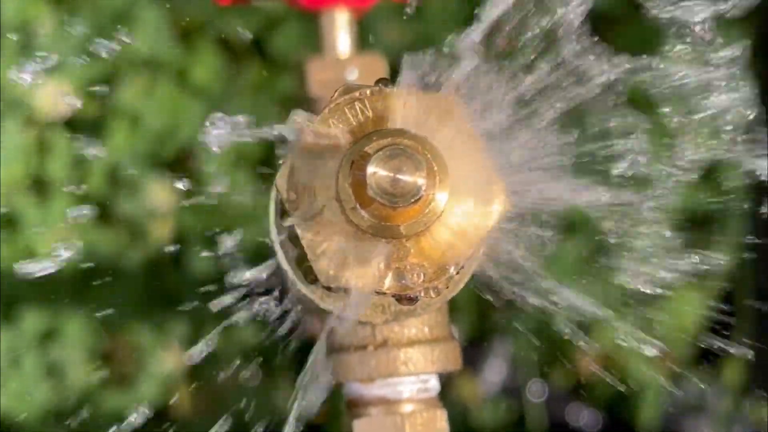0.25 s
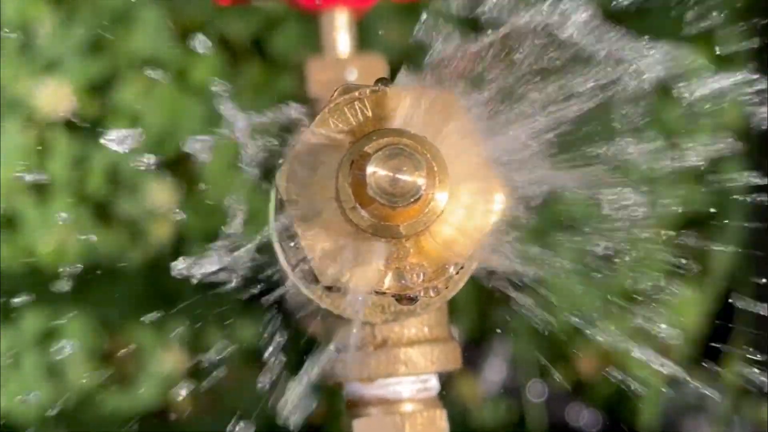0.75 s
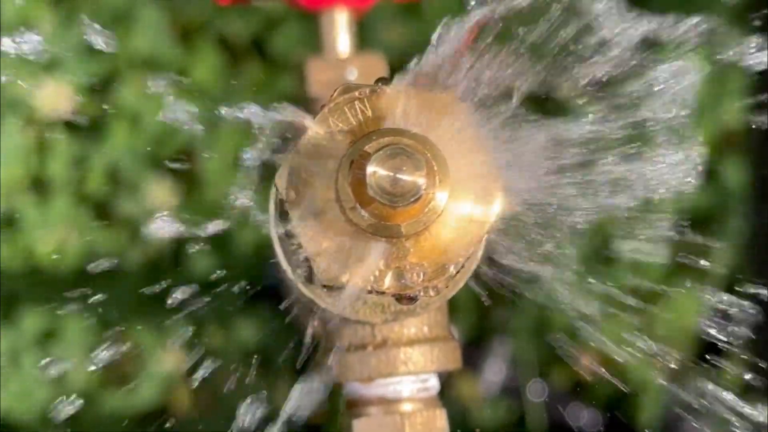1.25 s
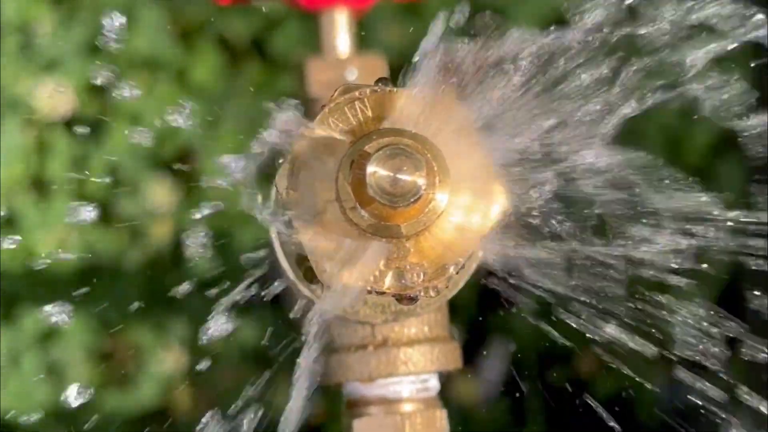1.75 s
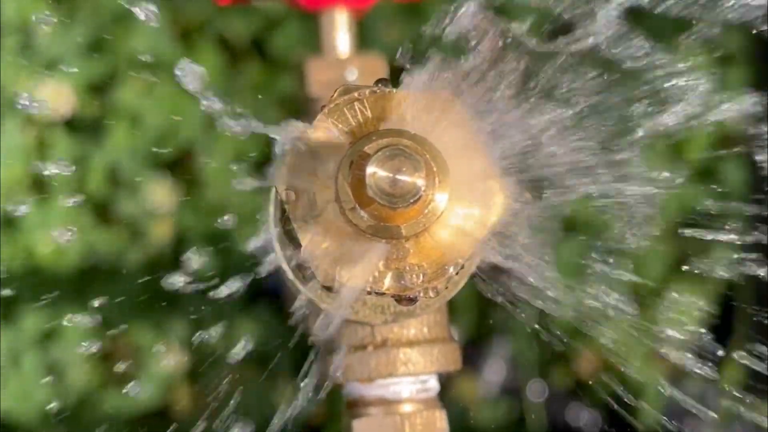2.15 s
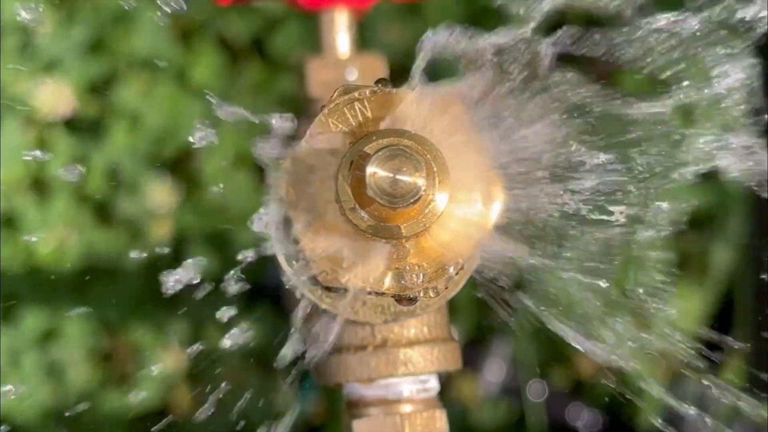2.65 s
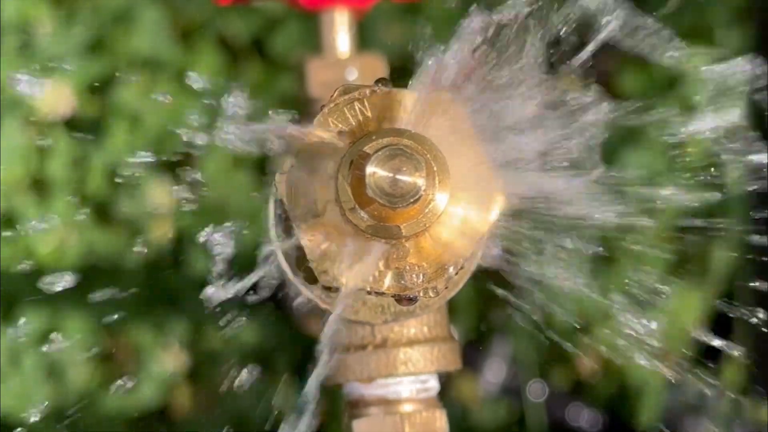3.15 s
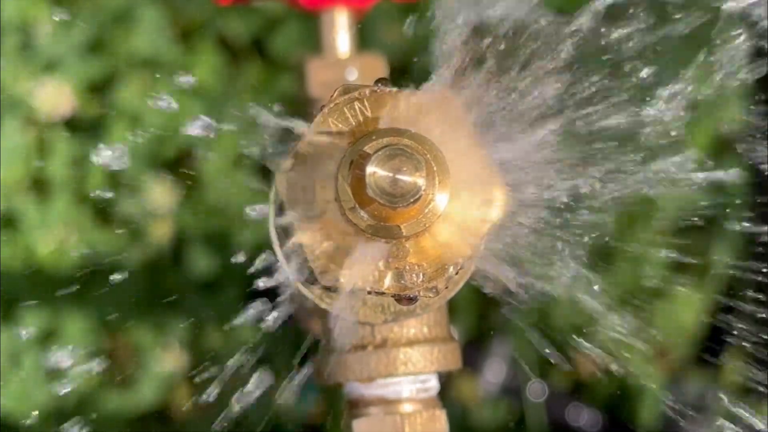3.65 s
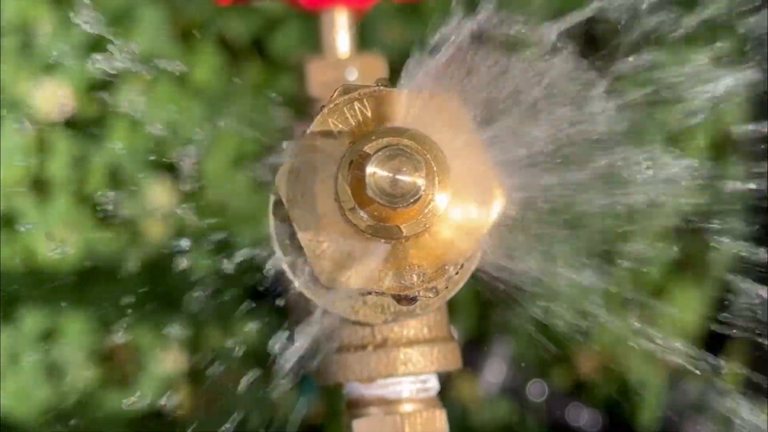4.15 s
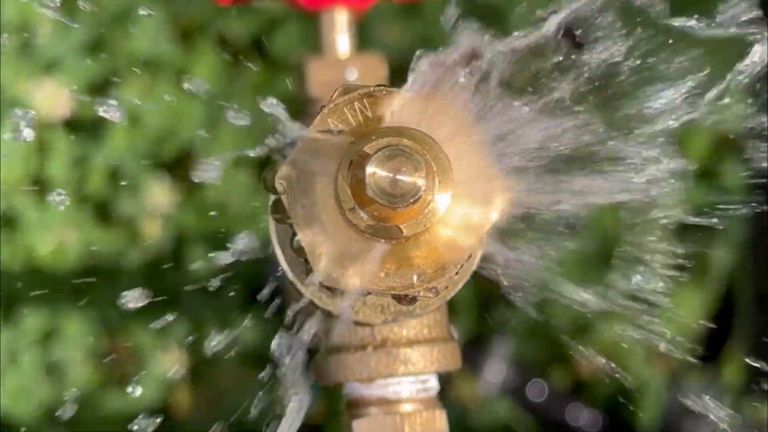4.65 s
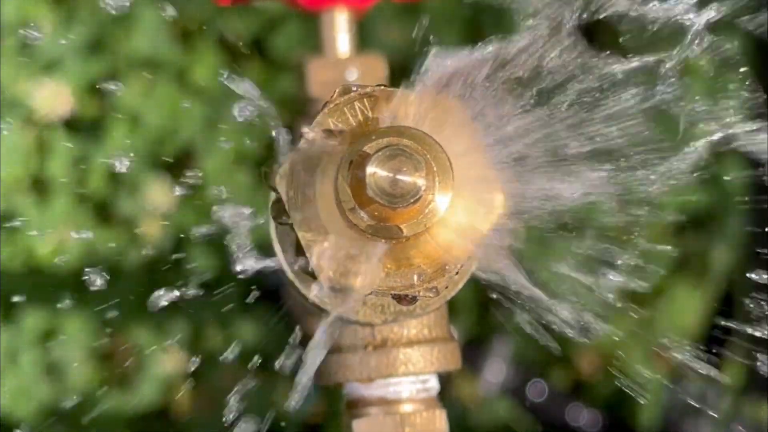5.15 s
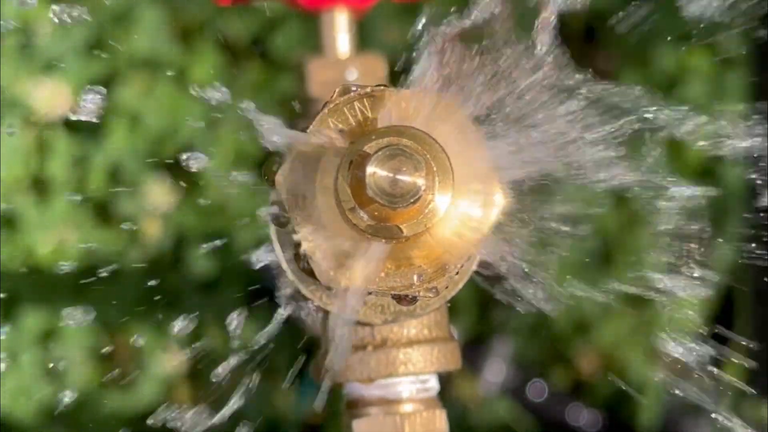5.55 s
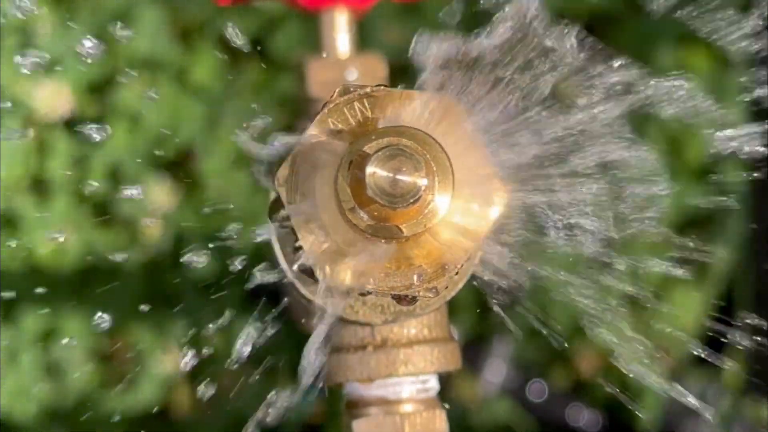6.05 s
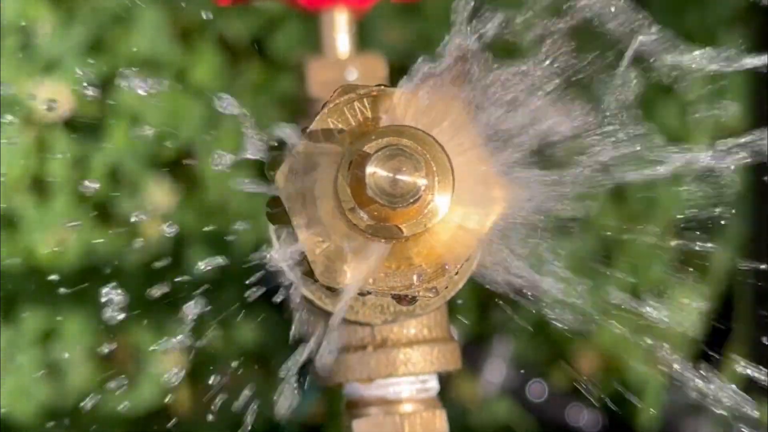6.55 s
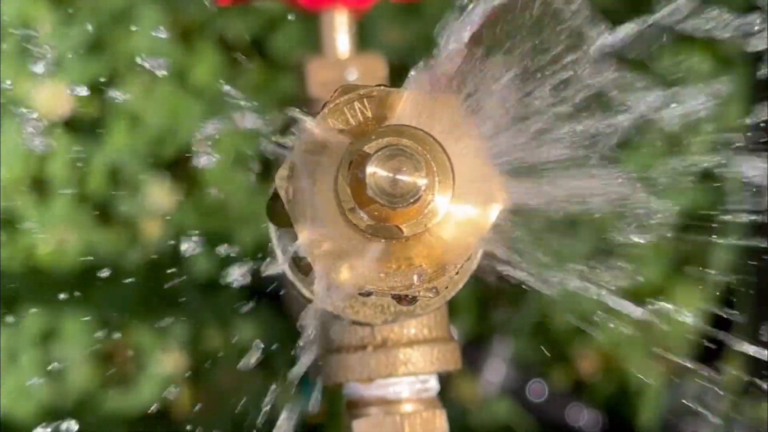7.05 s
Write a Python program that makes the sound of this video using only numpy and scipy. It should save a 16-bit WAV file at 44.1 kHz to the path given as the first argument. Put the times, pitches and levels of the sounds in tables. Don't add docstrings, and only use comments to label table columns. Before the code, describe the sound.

Close, steady, rapidly flapping water spray hisses and spatters from a metal sprinkler head, with small taps on its casing and faint machine hum behind.

```python
import sys
import numpy as np
from scipy import signal
from scipy.fft import rfft, irfft
from scipy.io import wavfile
from scipy.ndimage import uniform_filter1d

SR = 44100
rng = np.random.default_rng(int(sys.argv[2]) if len(sys.argv) > 2 else 0)


def decibels_to_gain(level_db):
    exponent = np.asarray(level_db, float) / 20
    return 10 ** exponent


def materialize(psi):
    bounded = np.clip(np.atleast_2d(psi).T, -1, 1)
    quanta = np.round(bounded * 32767).astype(np.int16)
    wavfile.write(sys.argv[1], SR, quanta)


N = 321048


def evened(x):
    return x / np.sqrt(np.mean(x ** 2) + 1e-20)


def read(points, hz):
    f, value = np.transpose(points)
    return np.interp(np.log(hz + 1), np.log(f + 1), value)


def follow(rows, column=1):
    return np.interp(np.arange(N) / SR, [r[0] for r in rows], [r[column] for r in rows])


def shaped(x, gain):
    return irfft(rfft(x) * gain(np.fft.rfftfreq(N, 1 / SR)), N)


def wobble(centre_hz, width_hz):
    def resonance(hz):
        return 1 / (1 + (2 * (hz - centre_hz) / width_hz) ** 2)
    return evened(shaped(rng.standard_normal(N), resonance))


# (time [s], level [dB])
FLOW = [(0, -30), (.5, -31.5), (1.2, -31), (1.6, -31.5), (2.1, -30.8), (2.7, -31.5), (3.2, -31.5),
        (3.55, -31), (3.85, -33), (4.25, -35), (4.5, -32.5), (5, -32.5), (5.3, -32), (5.8, -32),
        (6.3, -31.5), (6.8, -32.5), (7.28, -31.5)]


def flow_db():
    return follow(FLOW)


def flow_change_db():
    return flow_db() - np.mean(flow_db())


# (frequency [Hz], level under the sum [dB])
SIDE_LEVEL = [(60, -53), (200, -18), (380, -11.5), (720, -11.5), (1000, -35.5), (4500, -30), (5600, -18.5),
              (6800, -56), (8200, -13.5), (10000, -8), (15000, -5)]
# (frequency [Hz], share [0..1])
TIED_SHARE = [(100, .15), (300, 0.43), (1000, 0.26), (5000, .7), (15000, .85)]
# (frequency [Hz], phase [rad])
TIED_LEAD = [(100, -1.85), (1200, -1.85), (3000, 1.57), (15000, 1.57)]


def ports(pair):
    hz = np.fft.rfftfreq(N, 1 / SR)
    share = np.clip(read(TIED_SHARE, hz), 0, 1)
    tied = share * np.exp(1j * read(TIED_LEAD, hz)) * rfft(pair[0])
    loose = np.sqrt(1 - share ** 2) * rfft(pair[1])
    side = irfft(decibels_to_gain(read(SIDE_LEVEL, hz)) * (tied + loose), N)
    return np.array([pair[0], side])


# (frequency [Hz], density [dB per Hz])
RUMBLE_COLOUR = [(15, -45), (28, -20), (45, -5), (60, 2), (100, 0.5), (130, -3.5), (170, -10), (300, -15),
                 (450, -16.5), (650, -48.5)]


def rumble():
    start_db, sag_db_per_s, db_per_flow_db = -51., 0.09, 0.95
    gust_db, gust_hz = 1.1, 2.7
    pair = shaped(rng.standard_normal((2, N)), lambda hz: decibels_to_gain(read(RUMBLE_COLOUR, hz)))
    level_db = start_db - sag_db_per_s * np.arange(N) / SR + db_per_flow_db * flow_change_db()
    level_db = level_db + gust_db * wobble(0., gust_hz)
    return ports(pair / np.std(pair[0]) * decibels_to_gain(level_db))


# (frequency [Hz], sum level [dB], difference level [dB])
MOTOR_TONES = [(59.2, -64, -95), (236.9, -62, -77), (473.7, -75, -78), (521.2, -78, -80), (710.6, -73, -73)]


def motor():
    start_s, rise_s = 0.31, 0.31
    t, out = np.arange(N) / SR, np.zeros((2, N))
    dip_db = 0.45 * uniform_filter1d(flow_change_db(), size=SR // 2)
    for hz, sum_db, side_db in MOTOR_TONES:
        phase = 2 * np.pi * (hz * t + rng.random())
        level = np.sqrt(2) * decibels_to_gain(dip_db + 0.4 * wobble(0., 0.9))
        out += level * np.array([decibels_to_gain(sum_db) * np.cos(phase), decibels_to_gain(side_db) * np.sin(phase)])
    return out * np.clip((t - start_s) / rise_s, .2, 1)


# (time [s], frequency [Hz], level [dB])
ENGINE = [(0, 139, -61.5), (1.7, 140.9, -61), (2.9, 140.4, -58.5), (3.5, 138, -58), (4.2, 138.8, -68.5),
          (4.75, 139.1, -57.5), (5.2, 139, -86)]
# (time [s], frequency [Hz], level [dB])
WHINE = [(1.6, 168.4, -63), (2.6, 166.6, -67.5), (3.9, 166.2, -61)]


def engines():
    t, out = np.arange(N) / SR, np.zeros((2, N))
    for rows in ENGINE, WHINE:
        start_s, end_s = rows[0][0] - 0.066, rows[-1][0]
        fade = np.clip(np.minimum(t - start_s, end_s - t) / 0.25, 0, 1)
        level = decibels_to_gain(follow(rows, column=2) + 1.4 * wobble(0., 2.9))
        phase = 2 * np.pi * np.cumsum(follow(rows)) / SR
        out[0] += np.sqrt(2) * fade * level * np.cos(phase)
    return out


# (time [s], frequency [Hz], width [Hz], level [dB], t60 [s])
CLANK_RINGS = [
    (.255, 375, 21, -53, 0.45),
    (.275, 653, 24, -51, 1),
]


def clank():
    rise_s, side_db = .025, 1
    out = np.zeros((2, N))
    for s, centre_hz, width_hz, db, t60_s in CLANK_RINGS:
        t = np.maximum(np.arange(N) / SR - s, 0)
        ring = np.array([wobble(centre_hz, width_hz), decibels_to_gain(side_db) * wobble(centre_hz, width_hz)])
        out += ring * np.minimum(t / rise_s, 1) * decibels_to_gain(db - 60 * t / t60_s)
    return out


# (time [s], peak [dB], start pitch [Hz], end pitch [Hz], length [s])
KNOCKS = [
    (.4055, -37, 1500, 1350, .004),
    (0.407, -30, 760, 630, 0.011),
    (.408, -28.5, 517, 165, 0.0206),
    (1.347, -39, 600, 300, 0.0047),
    (2.0105, -36, 1420, 1380, .005),
    (2.029, -34, 1250, 1100, 0.003),
    (2.0529, -27, 1410, 1250, 0.0036),
    (2.0535, -35, 620, 260, 0.0044),
    (2.064, -35, 567, 250, 0.0043),
    (2.073, -38, 450, 250, 0.0043),
]


def knocks():
    lean = -0.68
    out = np.zeros((2, N))
    for s, db, start_hz, end_hz, length_s in KNOCKS:
        u = np.linspace(0, 1, round(length_s * SR))
        pitch_hz = start_hz * (end_hz / start_hz) ** u
        thud = decibels_to_gain(db) * np.sin(np.pi * u ** .7) * np.sin(2 * np.pi * np.cumsum(pitch_hz) / SR)
        side = lean * decibels_to_gain(read(SIDE_LEVEL, np.sqrt(start_hz * end_hz)))
        start = round(s * SR)
        out[:, start:start + len(u)] += np.outer([1, side], thud)
    return out


def droplets(per_s, spread_db, cycles, count):
    size = decibels_to_gain(spread_db * np.minimum(rng.exponential(1, N), 5)) * (rng.random(N) < per_s / SR)
    kind, out = rng.integers(0, count, N), np.zeros(N)
    for k, hz in enumerate(np.geomspace(500, 14500, count)):
        u = np.arange(400) / SR * hz / cycles
        grain = u * np.exp(-3 * u) * np.sin(2 * np.pi * cycles * u * (1 + 0.079 * u))
        grain = np.sqrt(hz) * grain / np.linalg.norm(grain)
        out += signal.oaconvolve(size * (kind == k), grain)[:N]
    return evened(out)


def sheet_flap():
    flap_hz, flap_width_hz = 111, 28
    swing = wobble(flap_hz, flap_width_hz) + 0.99 * wobble(0., 740.0) + 0.33 * wobble(5.7, 31.0)
    return 2.34 * np.tanh(swing / 2.73)


ZONE_EDGES = [1., 1800., 8300., 11800., 40000.]
# (share of the flap [ratio], own flicker [dB])
TEARING = [(0.58, 1), (0.89, 1.07), (1, .5), (0.75, 1.1)]


def torn_jet():
    drift_db, drift_hz = 0.56, 12
    depth_db = 2.5 + 0.23 * flow_change_db() + drift_db * wobble(0., drift_hz)
    flap = sheet_flap()
    hiss = 1.05 * rng.standard_normal(N)
    drops = 0.29 * droplets(per_s=7000., spread_db=2.6, cycles=3.2, count=24)
    jet = np.array([hiss + drops, rng.standard_normal(N)])
    out = np.zeros((2, N))
    for low, high, (shared, own_db) in zip(ZONE_EDGES, ZONE_EDGES[1:], TEARING):
        def zone(hz):
            return 1 / np.sqrt((1 + (low / (hz + 1)) ** 6) * (1 + (hz / high) ** 6))
        throb_db = shared * depth_db * flap + own_db * wobble(0., 180.0)
        out += shaped(jet, zone) * evened(decibels_to_gain(throb_db))
    return out


# (frequency [Hz], density [dB per Hz])
SPRAY_COLOUR = [(180, -38), (300, -28), (535, -12.5), (1140, -4), (1540, -3), (2040, -5), (2900, 0.5),
                (3500, 0), (4440, -6.5), (5800, -3.5), (7050, -11), (8190, -9.5), (10300, -4.5),
                (13300, -8.5), (15800, -12.5)]
# (frequency [Hz], level [dB])
ECHO = [(3000, -34), (9000, -24), (12000, -17), (15000, -14)]


def spray():
    echo_s, surge_db, surge_hz = .001915, 0.44, 3.4

    def colour(hz):
        echo = decibels_to_gain(read(ECHO, hz)) * np.exp(-2j * np.pi * hz * echo_s)
        return decibels_to_gain(read(SPRAY_COLOUR, hz)) * (1 - echo)
    out = shaped(torn_jet(), colour)
    level_db = flow_db() + surge_db * wobble(0., surge_hz)
    return ports(out / np.std(out[0]) * decibels_to_gain(level_db))


def scene():
    mid, side = rumble() + motor() + engines() + clank() + knocks() + spray()
    return np.array([mid + side, mid - side])


def band_limit(x):
    return signal.sosfilt(signal.butter(12, 16970, fs=SR, output="sos"), x)


# (frequency [Hz], gain [dB])
TOP_LIFT = [(13300, 0.), (15600, 5.)]


def record(dry):
    edge_hz, slope_hz = 15760, 40

    def response(hz):
        return decibels_to_gain(read(TOP_LIFT, hz)) * np.clip((edge_hz - hz) / slope_hz, 0, 1) ** 2
    return band_limit(shaped(dry, response))


dry = scene()
out = record(dry)
materialize(out)
```